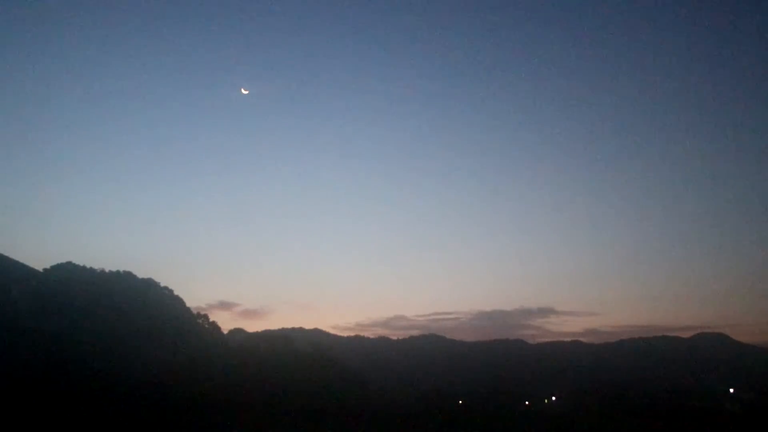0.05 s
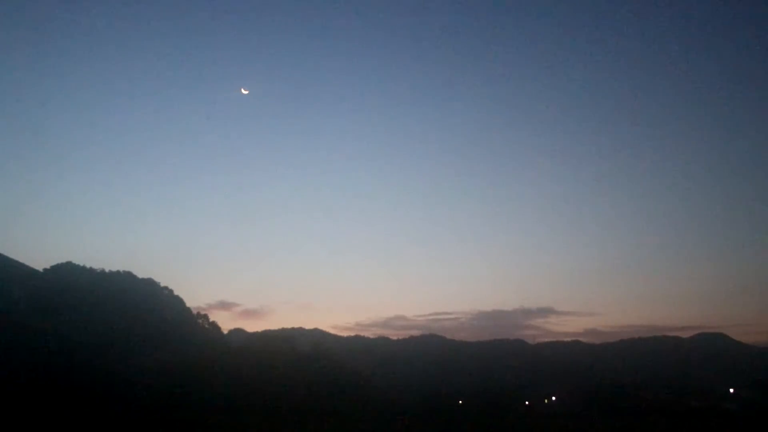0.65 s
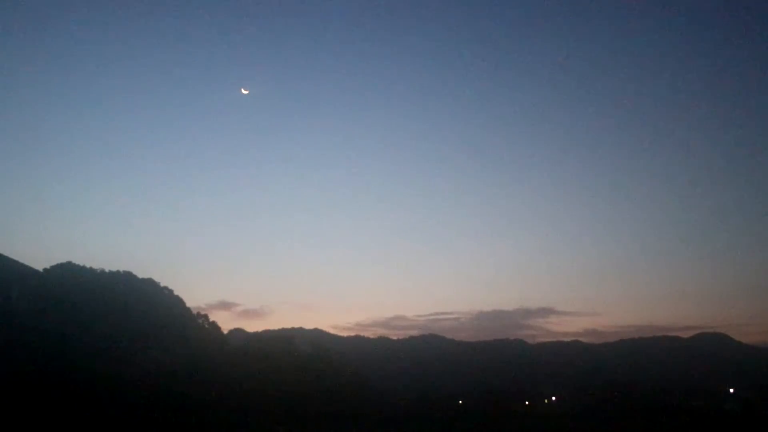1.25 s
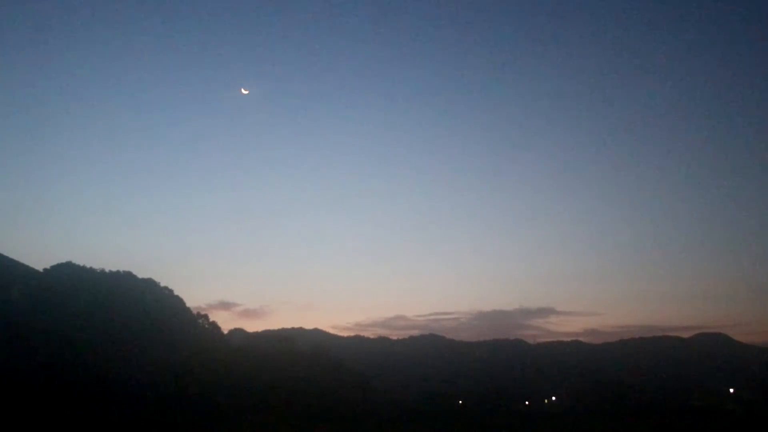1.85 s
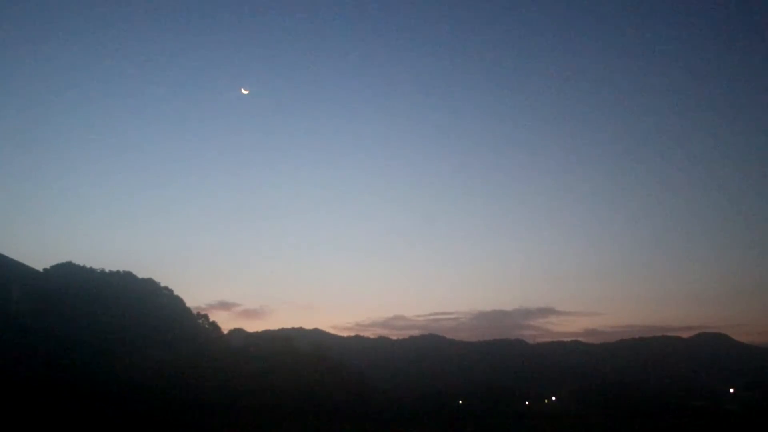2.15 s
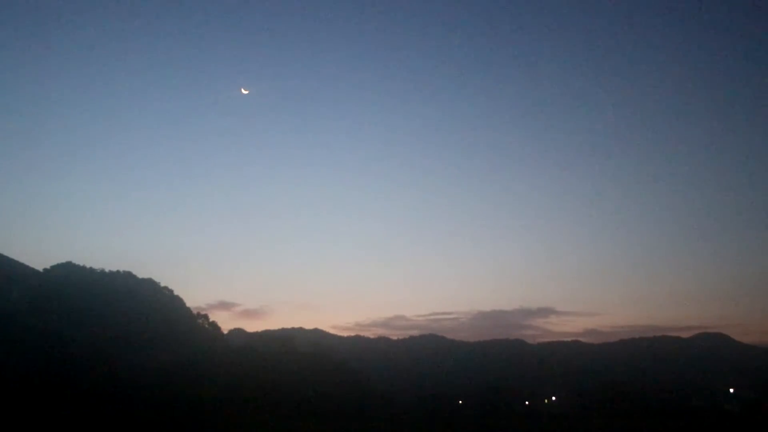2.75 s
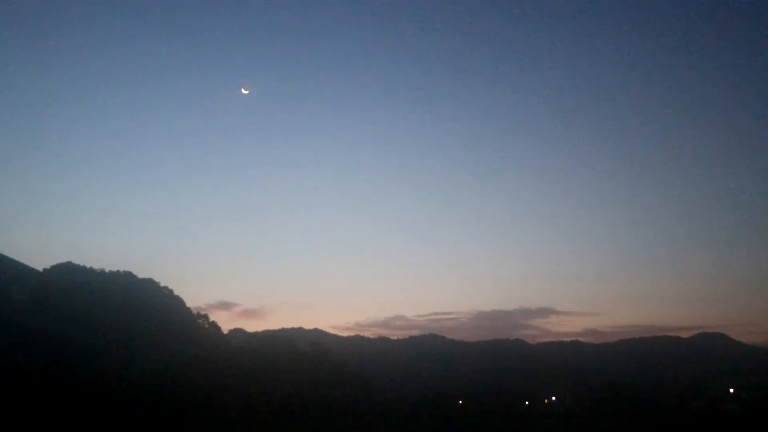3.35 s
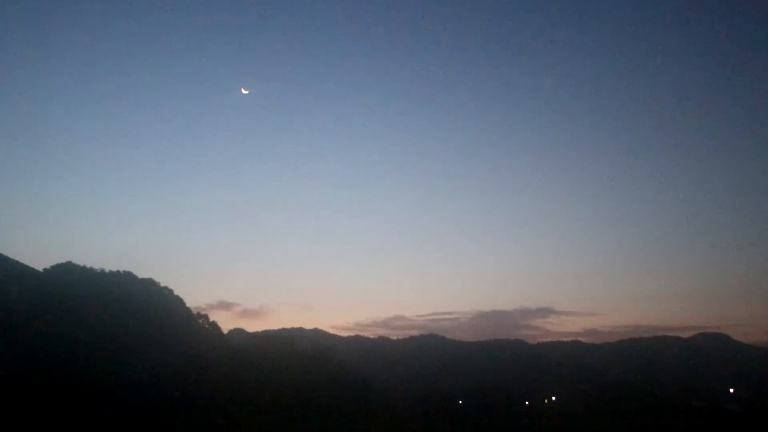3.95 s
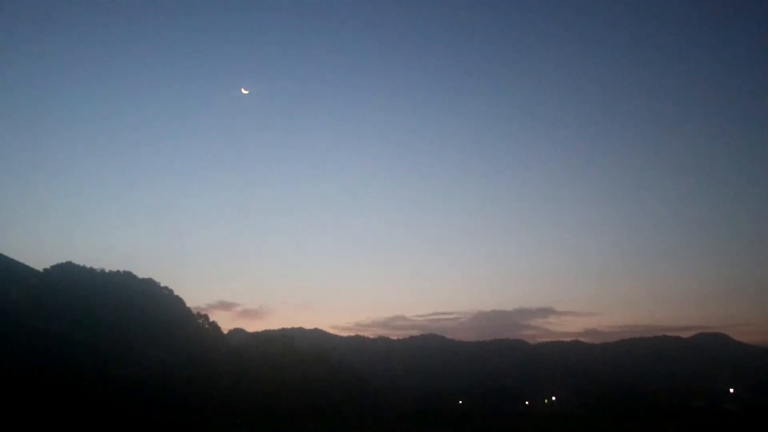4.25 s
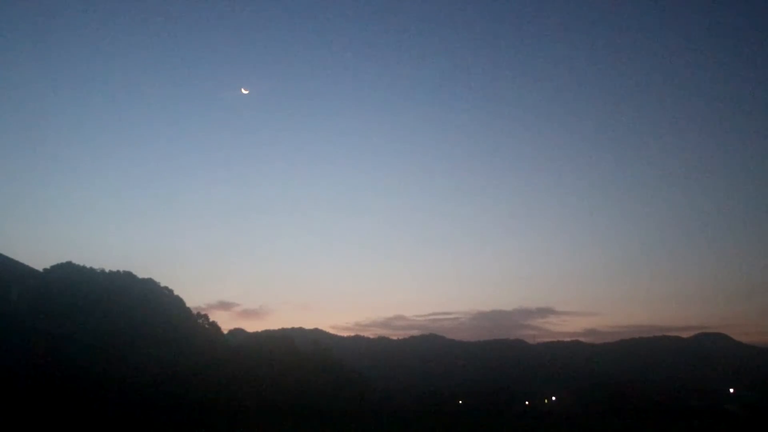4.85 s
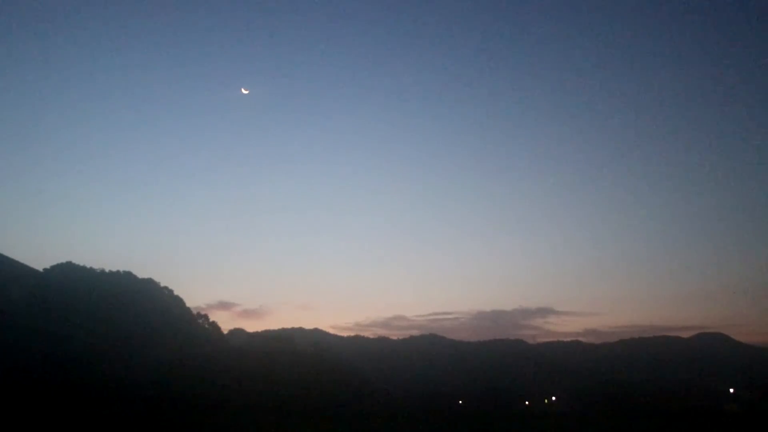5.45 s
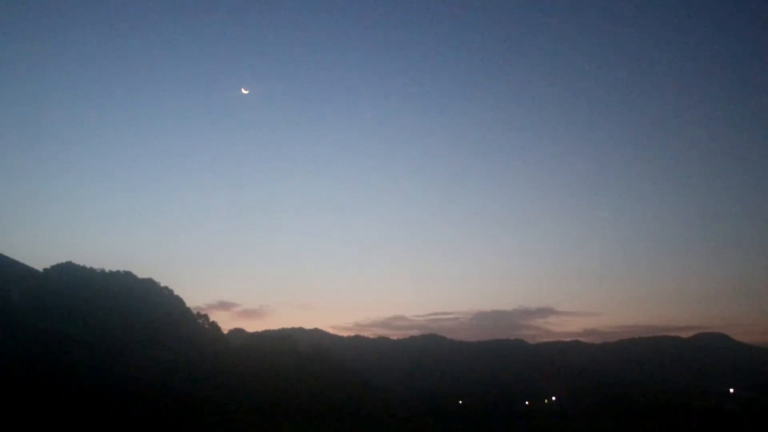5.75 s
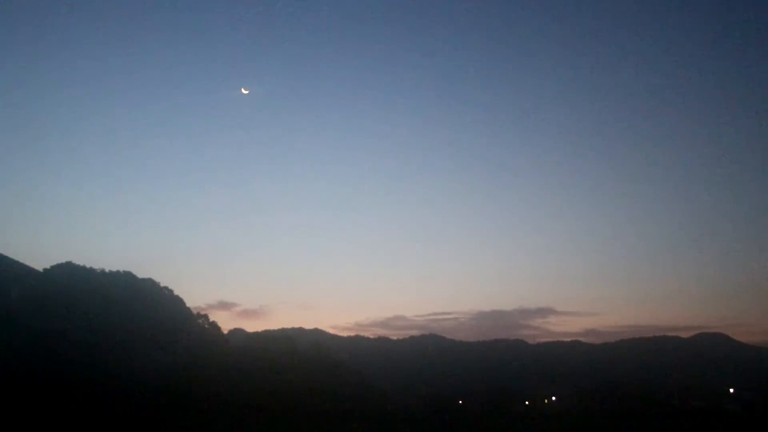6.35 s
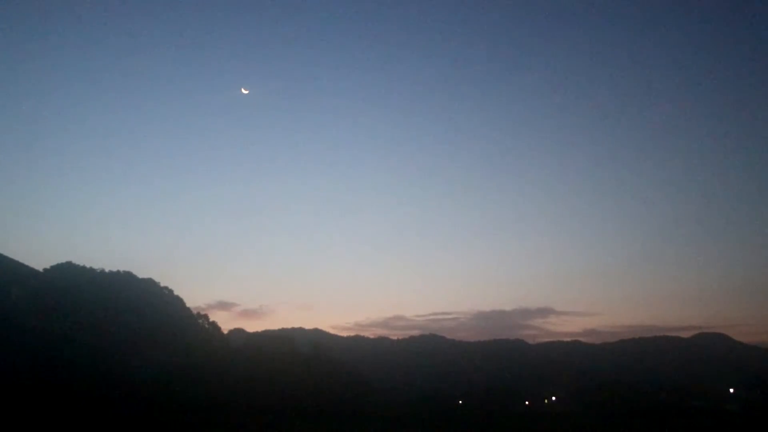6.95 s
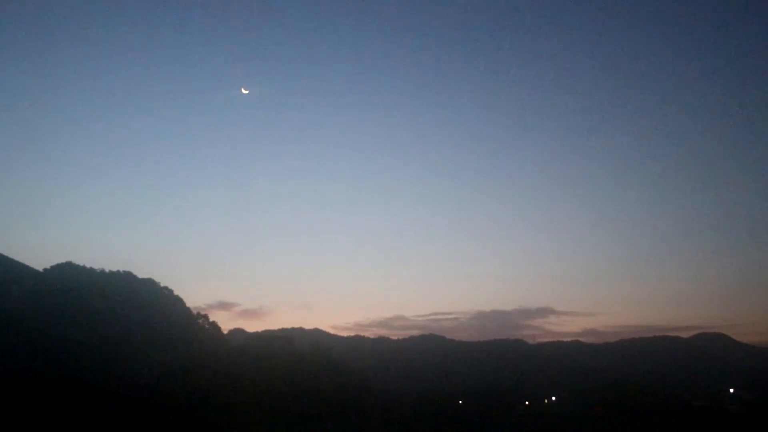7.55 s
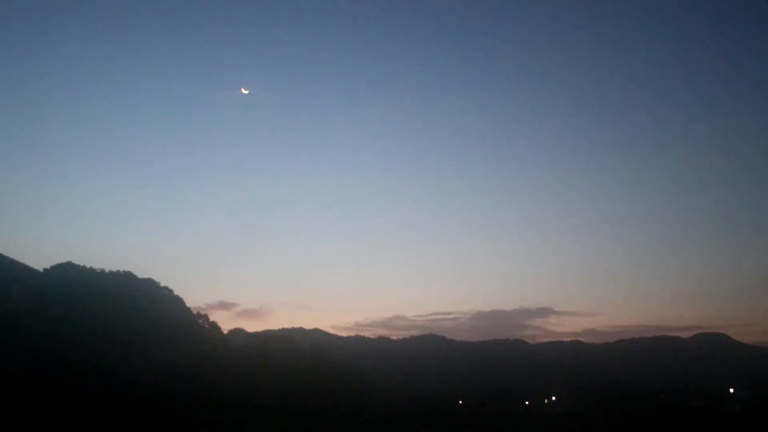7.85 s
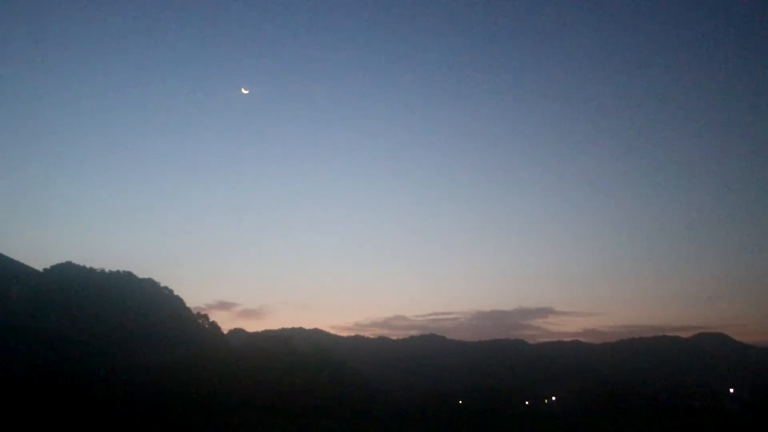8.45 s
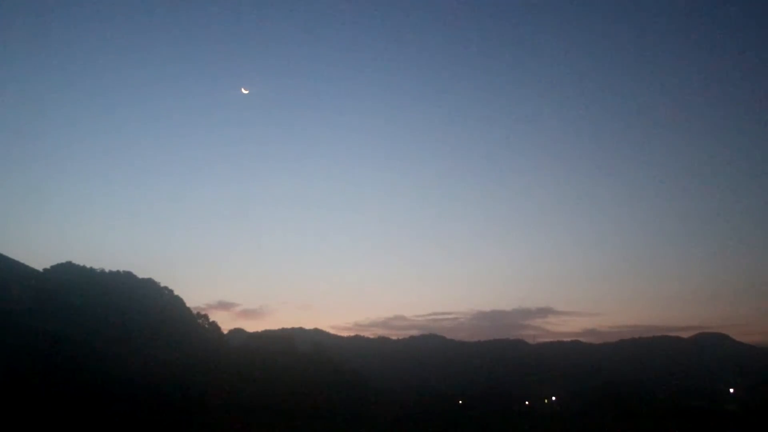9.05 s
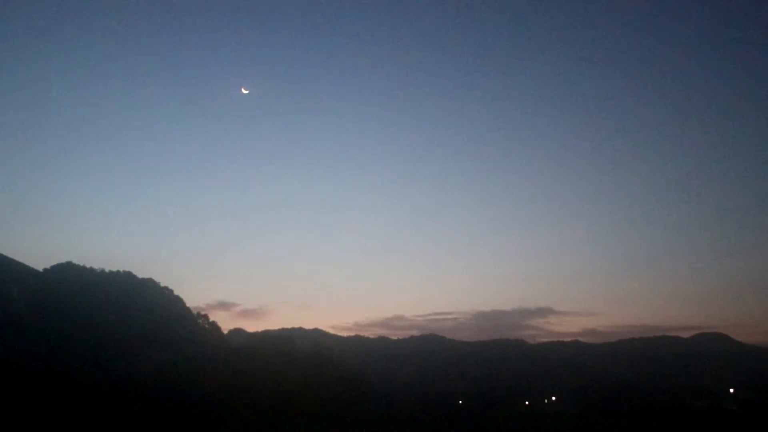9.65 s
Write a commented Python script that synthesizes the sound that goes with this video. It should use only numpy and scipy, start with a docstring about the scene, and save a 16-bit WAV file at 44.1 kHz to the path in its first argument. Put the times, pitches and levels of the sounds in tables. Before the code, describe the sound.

Night insects trill and buzz in a continuous high ring outdoors, until a closer tree cricket adds its pulsing, slightly raspy song.

```python
"""A far chorus of tree crickets rings near 2.1 kHz and its overtones, over a faint hiss: dusk in wooded hills.
Smaller insects trill, buzz and chirp higher up. Halfway through, a nearer tree cricket joins in,
and a few faint blips sound far off. A cricket sings by dragging a scraper on one wing over a row
of teeth, the file, on the other. Leaves scatter the single songs and give them a short echo."""
import sys
import numpy as np
from scipy import signal
from scipy.fft import rfft, irfft, next_fast_len
from scipy.io import wavfile
from scipy.ndimage import map_coordinates

SR = 44100
rng = np.random.default_rng(int(sys.argv[2]) if len(sys.argv) > 2 else 0)


def wav_record(signal):
    """Record a signal, one row per channel, as 16-bit PCM in the file named by sys.argv[1]."""
    frames = np.transpose(np.atleast_2d(signal))
    bounded = np.clip(frames, -1, 1)
    # unit amplitude maps onto the largest positive 16-bit level
    quanta = np.round(bounded * 32767).astype(np.int16)
    wavfile.write(sys.argv[1], SR, quanta)


N = 427769  # samples: 9.7 seconds


def amp(db):
    """Turns decibels into a number to multiply by."""
    return 10 ** (np.asarray(db) / 20)


def unit(x):
    """Scales a signal so that its average power is 1."""
    return x / np.sqrt(np.mean(x ** 2) + 1e-20)


def along(points, hz):
    """Reads between (frequency_hz, value) points, giving each octave equal room."""
    point_hz, values = np.transpose(points)
    return np.interp(np.log(hz + 1), np.log(point_hz + 1), values)


def clock():
    """The time in seconds at each sample."""
    return np.arange(N) / SR


def wobble(rate_hz):
    """A smooth curve through rate_hz random values a second."""
    values = rng.standard_normal(int(N * rate_hz / SR) + 4)
    coarse = np.arange(0, N, 64)
    return np.interp(np.arange(N), coarse, map_coordinates(values, [coarse * rate_hz / SR]))


def filtered(x, response):
    """Turns each frequency up or down by response(hz)."""
    size = next_fast_len(N + 8192)
    return irfft(rfft(x, size) * response(np.fft.rfftfreq(size, 1 / SR)), size)[..., :N]


def panned(pair, pan_db):
    """Moves a stereo sound left (positive pan_db) or right (negative)."""
    return pair * unit(amp([[pan_db / 2], [-pan_db / 2]]))


def blend(pair, likeness):
    """Mixes two signals into left and right: likeness 1 is the same, 0 unrelated, -1 opposite."""
    turn = np.arccos(np.clip(likeness, -1, 1)) / 2
    mid, side = pair[0] * np.cos(turn), pair[1] * np.sin(turn)
    return np.array([mid + side, mid - side])


def foliage(x, echo_s, direct):
    """Leaves and ground add a short echo, different on each side; direct is the unscattered share."""
    t = np.arange(SR // 4) / SR
    tail = rng.standard_normal((2, len(t))) * amp(-60 * t / echo_s)
    tail /= np.linalg.norm(tail, axis=1, keepdims=True)
    scattered = signal.oaconvolve(np.float32(x[None]), np.float32(tail), axes=1)[:, :N]
    return np.sqrt(direct) * x + np.sqrt(1 - direct) * scattered


def wing(pitch_hz, stroke_hz, fall_hz, waver_hz, unsteady):
    """The scraper slows at the end of each stroke over the file, so the tone falls."""
    stroke = np.cumsum(stroke_hz * (1 + unsteady * wobble(5))) / SR % 1  # runs from 0 to 1 each stroke
    tone_hz = pitch_hz - fall_hz * stroke ** 2 + waver_hz * wobble(300)
    phase = 2 * np.pi * np.cumsum(tone_hz) / SR
    return stroke, phase


def pressure(stroke, peak=0.68):
    """The scraper presses hardest at the peak of each stroke and lifts between strokes."""
    return unit(np.sin(np.interp(stroke, [0, peak, 1], [0, np.pi / 2, np.pi])) ** 2)


def chirps(middles_s, length_s, gains=1):
    """A short, rounded swell of loudness around each given time."""
    t, middles_s = clock(), np.array(middles_s)
    nearest = np.searchsorted((middles_s[1:] + middles_s[:-1]) / 2, t)
    offset = 2 * (t - middles_s[nearest]) / length_s
    swell = np.exp(-np.minimum(offset ** 4, 20))
    return (gains * np.ones(len(middles_s)))[nearest] * swell


def chirp_times(first_s, tempo):
    """The time of each chirp: one on every beat of a changing tempo."""
    t = clock()
    beats = np.cumsum(np.interp(t, *np.transpose(tempo))) / SR
    beats -= np.interp(first_s, t, beats)
    return np.interp(np.arange(np.ceil(beats[-1])), beats, t)


def singing(spans, fade_s):
    """1 while an insect sings and 0 while it rests, with soft edges."""
    t = clock()
    return sum(np.clip(np.minimum(t - start, end - t) / fade_s + .5, 0, 1) for start, end in spans)


# How strong the air's hiss is, from low to high: frequency_hz, relative_level_db
AIR_TONE = [(20, -15), (55, 0), (130, -2.5), (400, -3.5), (650, -6), (950, -10), (1250, -8.5),
            (1600, -11.5), (3000, -14), (5000, -16), (7000, -14), (9300, -21), (11300, -21.5),
            (15000, -28.5)]
# How alike its left and right sides are: frequency_hz, likeness (-1 to 1)
AIR_LIKENESS = [(40, 0.92), (250, -0.036), (650, 0.42), (1300, 0.058), (2700, -0.13), (4500, -0.38),
                (12000, 0.14)]
# How far it leans to the left: frequency_hz, pan_db
AIR_LEAN = [(40, -0.5), (200, -3), (700, -0.5), (3000, -3.5), (10000, 0)]


def night_air():
    """A faint steady hiss with the low murmur of the valley."""
    size = next_fast_len(N)
    hz = np.fft.rfftfreq(size, 1 / SR)
    noise = blend(rfft(rng.standard_normal((2, size))), along(AIR_LIKENESS, hz))
    pan_db = along(AIR_LEAN, hz)
    gain = amp(along(AIR_TONE, hz) + np.array([pan_db, -pan_db]) / 2)
    return amp(-53.0) * unit(irfft(noise * gain, size)[:, :N])


# Faint, far notes: middle_s, pitch_hz, level_db
FAR_NOTES = [(5.13, 1340, -58), (7.55, 767, -54), (9.25, 1260, -58)]


def far_blips():
    """Now and then something far off gives a short, blurred note."""
    wavering_time = np.cumsum(1 + 0.042 * wobble(60)) / SR
    notes = sum(amp(level_db) * chirps([middle_s], length_s=0.042) * np.sin(2 * np.pi * hz * wavering_time)
                for middle_s, hz, level_db in FAR_NOTES)
    return foliage(notes, echo_s=.2, direct=0.36)


# A small cricket's runs of chirps: start_s, end_s, full_level_db
CHIRP_RUNS = [(.87, 2.22, -62), (2.99, 3.46, -64), (4.61, 5.25, -58), (5.55, 5.9, -61), (6.745, 7.39, -58),
              (9.545, 9.75, -58)]


def small_cricket():
    """Faint, evenly spaced chirps of four or five strokes, in runs that start softly and grow louder."""
    spacing_s, soft_start_db, swell_s = .142, 3.5, 0.28
    middles_s, level_db = np.transpose([
        (middle_s, full_db - soft_start_db * np.exp((start_s - middle_s) / swell_s))
        for start_s, end_s, full_db in CHIRP_RUNS for middle_s in np.arange(start_s, end_s, spacing_s)])
    stroke, phase = wing(5400, stroke_hz=69.8, fall_hz=325, waver_hz=150, unsteady=.01)
    song = chirps(middles_s, length_s=0.06, gains=amp(level_db)) * pressure(stroke) * np.sin(phase)
    pair = foliage(song, echo_s=0.074, direct=0.16)
    pair[0] = np.roll(pair[0], shift=4)  # coming from the right, it reaches the left side later
    return panned(pair, -1.1)


def trilling_cricket():
    """One cricket holds a thin, even trill; no two strokes have quite the same pitch."""
    pitch_hz = 6675 + 16 * wobble(25)
    stroke, phase = wing(pitch_hz, stroke_hz=36.96, fall_hz=79.4, waver_hz=24.2, unsteady=0.011)
    return amp(-57.5) * unit(foliage(pressure(stroke) * np.sin(phase), echo_s=0.46, direct=0.28))


# When the lower ground cricket buzzes: start_s, end_s
LOW_BUZZES = [(-.2, 1.13), (3.05, 4.02), (5.44, 7.22), (8.95, 9.9)]
# When the higher one buzzes: start_s, end_s
HIGH_BUZZES = [(-.2, .25), (.39, 2.92), (3.04, 5.7), (5.83, 8.39), (8.49, 9.9)]


def ground_crickets():
    """Two ground crickets stroke so fast that they buzz, in long stretches."""
    stroke, phase = wing(7340, stroke_hz=130.0, fall_hz=523, waver_hz=210, unsteady=0.0034)
    low = singing(LOW_BUZZES, fade_s=.07) * pressure(stroke) * np.sin(phase)
    low = foliage(low, echo_s=0.026, direct=0.24)
    stroke, phase = wing(8230, stroke_hz=92.6, fall_hz=799, waver_hz=289.7, unsteady=.008)
    high = singing(HIGH_BUZZES, fade_s=.04) * pressure(stroke) * np.sin(phase)
    high = foliage(high, echo_s=0.015, direct=0.4)
    high[1] = np.roll(high[1], shift=3)  # coming from the left, it reaches the right side later
    return amp(-57.0) * panned(low, -1) + amp(-54.5) * panned(high, 1)


def crowd(count, stroke_hz, chirp_hz):
    """One click per wing stroke of many crickets, each with its own tempo and its own chirps."""
    stroke_offset, pace, chirp_offset = rng.random((count, 3)).T[:, :, None]
    speed = .8 + .4 * pace
    step = np.arange(900)
    times_s = (step + stroke_offset + .1 * rng.standard_normal((count, len(step)))) / (stroke_hz * speed)
    swell = np.sin(np.pi * (times_s * chirp_hz * speed + chirp_offset)) ** 2
    clicks = swell * rng.choice([-1, 1], times_s.shape)
    return np.bincount(np.abs(times_s * SR).astype(int).ravel(), clicks.ravel(), N)[:N]


# Where the far chorus rings: pitch_hz, width_hz, level_db, pan_db, likeness (-1 to 1)
CHORUS_RINGS = [(1847, 118, -58.5, -5, -0.44), (2128, 132, -43, -6, -0.6), (3860, 430, -58.5, 10, -0.22),
                (4135, 244, -50.5, -5, -.05), (4306, 241, -51, -2.5, 0.41), (5420, 690, -73, 13, -0.045),
                (6363, 530, -52, -0.5, -0.15), (8310, 1120, -57, 0.5, 0.025), (10300, 850, -70, -1, 0.11),
                (13200, 490, -75.5, -1, 0)]


def far_chorus():
    """Strokes make the crowd's wings ring; their many pitches smear each ring into a band."""
    size = next_fast_len(N, real=True)
    hz = np.fft.rfftfreq(size, 1 / SR)
    strokes = rfft([unit(crowd(count=240, stroke_hz=50.02, chirp_hz=7.4)) for _ in range(2)], size)
    power, shared = 0, 0  # on each side, and common to both
    for pitch_hz, width_hz, level_db, pan_db, likeness in CHORUS_RINGS:
        ring = (1 + ((hz - pitch_hz) / width_hz) ** 2) ** -1.5
        gain = amp(level_db) * panned(unit(ring), pan_db)
        power = power + gain ** 2
        shared = shared + likeness * gain[0] * gain[1]
    pair = blend(strokes, shared / np.sqrt(power[0] * power[1]))
    return irfft(np.sqrt(power) * pair, size)[:, :N]


# The near cricket's tones, at 1 to 5 times its pitch: level_db, pan_db, peak (0 to 1 along the stroke)
NEAR_TONES = [(-47.5, 7, 0.3), (-45.5, 3.5, 0.26), (-51, -1, 0.2), (-51, 3.5, .36), (-59.5, 3, 0.76)]
# How fast it chirps: time_s, chirps_per_s
NEAR_CHIRP_RATE = [(5.13, 7.75), (6.3, 7.65), (6.6, 6.4), (8.4, 7.4), (8.7, 8.5), (9.7, 7.3)]
# Its second tone, an octave up, is strongest in the first two seconds or so: time_s, extra_db
NEAR_OCTAVE_BOOST = [(5.5, 3.5), (6.3, 1.5), (7.1, 5), (7.7, -1), (9.7, -2)]


def near_cricket():
    """A tree cricket starts a little high and settles; each tone peaks at its own point of the stroke."""
    start_s, rise_s, first_chirp_s = 5.0, 0.18, 5.13
    settled_hz, extra_hz, settle_s = 2107, 75.86, 1.2
    age_s = np.maximum(clock() - start_s, 0)
    pitch_hz = settled_hz + extra_hz * np.exp(-age_s / settle_s)
    effort = 1 - np.exp(-age_s / rise_s)
    stroke, phase = wing(pitch_hz, stroke_hz=36.03, fall_hz=148.8, waver_hz=29.97, unsteady=.15)
    swells = chirps(chirp_times(first_chirp_s, NEAR_CHIRP_RATE), length_s=0.11)
    loudness = effort * (0.41 + 0.4 * swells)  # the wings keep stroking between chirps
    octave_gain = amp(np.interp(clock(), *np.transpose(NEAR_OCTAVE_BOOST)))
    song = np.zeros((2, N))
    for k, (level_db, pan_db, peak) in enumerate(NEAR_TONES, 1):
        tone = loudness * pressure(stroke, peak) * np.sin(k * phase) * (octave_gain if k == 2 else 1)
        echo_s = 0.4 / np.sqrt(k)  # leaves soak up high tones sooner
        song += amp(level_db) * panned(foliage(tone, echo_s, direct=.03), pan_db)
    scrape = loudness * pressure(stroke) * rng.standard_normal(N)  # noise from the file's teeth
    rasp = filtered(scrape, lambda hz: 1 / (1 + (hz / 7000) ** 2))
    return song + amp(-56) * foliage(rasp, echo_s=0.21, direct=0.031)


def scene():
    """All the insects over the night air."""
    background = night_air() + far_blips()
    small_insects = small_cricket() + trilling_cricket() + ground_crickets()
    return background + small_insects + far_chorus() + near_cricket()


def record(dry):
    """Cuts away the very highest treble, above 15.2 kHz."""
    return filtered(dry, lambda hz: hz < 15200)


dry = scene()
out = record(dry)
wav_record(out)
```